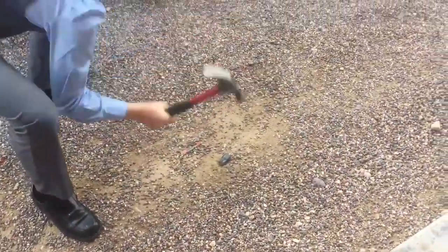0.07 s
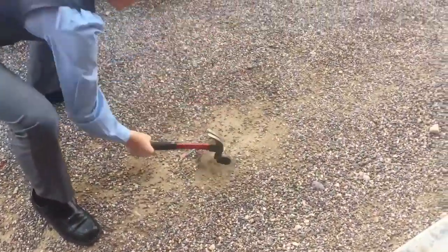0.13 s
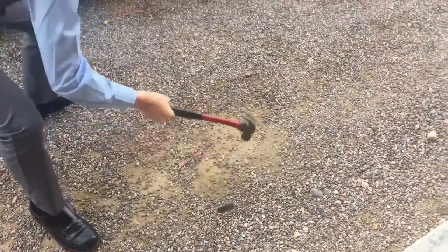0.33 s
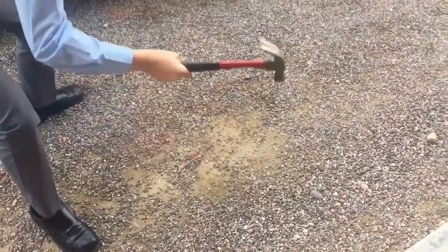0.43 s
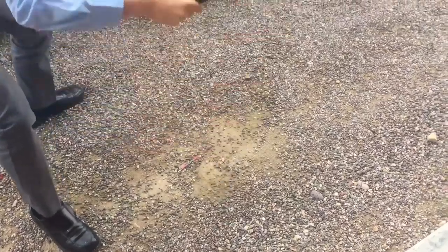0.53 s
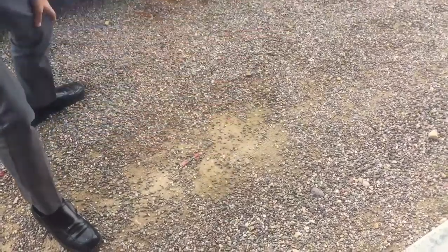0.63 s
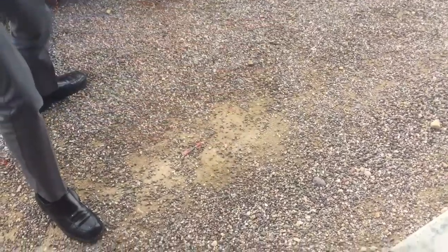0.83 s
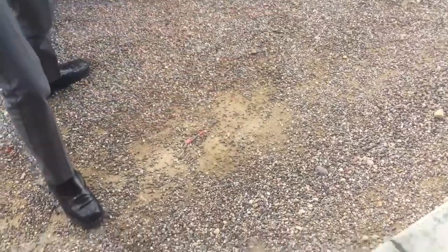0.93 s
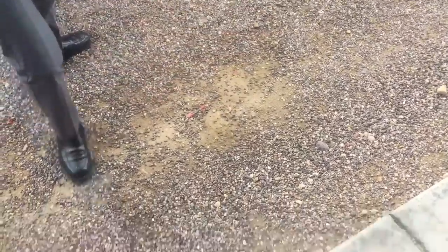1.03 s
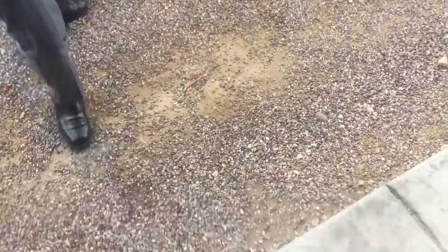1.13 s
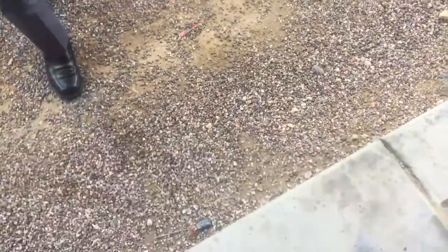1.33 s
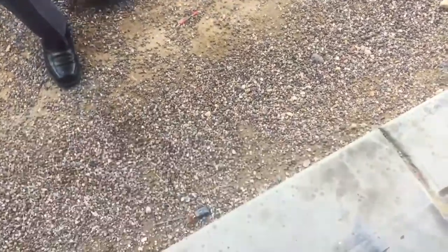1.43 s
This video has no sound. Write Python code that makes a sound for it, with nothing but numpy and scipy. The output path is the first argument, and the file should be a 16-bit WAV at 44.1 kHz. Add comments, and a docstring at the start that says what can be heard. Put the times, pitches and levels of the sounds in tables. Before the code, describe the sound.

A hammer strikes a small plastic device on gravel outdoors, close to the microphone. A light knock at 0.1 s, then at 0.23 s a very loud, overloaded crack with a short ground thump and sprayed stones. Pebbles tick. At 0.57 s the device lands crunching, with sharp clattering knocks around 0.7 s. From 1.0 s a shoe scuffs gravel, strongest near 1.15 s. A faint engine hum drops in pitch after 0.55 s.

```python
"""A hammer hits a small plastic device on gravel: quick cracks of noise, sine thuds and sprayed stones.
The device lands with a crunch and tumbles: each knock is a snap, a short ring and a rattle of noise.
Pebbles tick as tiny snaps with a fizz, fine grit patters, and a shoe scuffs the gravel as coarse and fine noise.
Behind it a distant engine hums on two sine tones that drop in pitch, over rumble and faint air noise.
"""
import sys
import numpy as np
from scipy import signal
from scipy.fft import rfft, irfft, next_fast_len
from scipy.io import wavfile
from scipy.ndimage import uniform_filter1d, map_coordinates

SR = 44100
rng = np.random.default_rng(int(sys.argv[2]) if len(sys.argv) > 2 else 0)


def to_wav(sig):
    """Store sig (one row per channel, or 1-D mono) as 16-bit WAV at the path in sys.argv[1].

    Samples outside -1..1 are clipped; the rate is SR.
    """
    pcm = np.clip(np.atleast_2d(sig), -1, 1) * 32767
    pcm = np.round(pcm).astype(np.int16)
    wavfile.write(sys.argv[1], SR, pcm.T)  # frames by channels


N = 66150  # samples
T = np.arange(N) / SR  # time of each sample, s

# In spectra the levels only set the colour (balance between pitches); t60 is the time to fall by 60 dB.

# Engine tone: [t/s, pitch f/Hz, level/dB, octave level/dB]
ENGINE = [(0, 139.5, -52, -60), (.1, 139.5, -57, -60), (.17, 139, -51, -60), (.36, 139.5, -50, -64),
          (.55, 139, -48, -60), (.6, 129, -48, -68), (.69, 130, -45, -72), (.73, 125, -54, -72),
          (.77, 120, -50, -72), (.86, 116.5, -46, -68), (.92, 111.5, -48, -64), (1.02, 113, -45, -63),
          (1.1, 114, -47, -63), (1.22, 113.5, -49, -65), (1.5, 113.5, -46.5, -67)]
# Colour of the low rumble: [f/Hz, level/dB]
RUMBLE_COLOUR = [(20, -18), (45, -6), (65, -1), (92, 0), (110, -10), (160, -12), (350, -22), (500, -60)]
# Loudness of the rumble: [t/s, level/dB]
RUMBLE_LEVEL = [(0, -44.5), (.06, -54), (.2, -47.5), (.35, -45.5), (.55, -55), (.7, -56), (1, -54.5),
                (1.25, -54), (1.5, -54)]
# Colour of the faint air noise: [f/Hz, level/dB]
AIR_COLOUR = [(300, -4.5), (600, 2.5), (1200, -3), (2500, -5.5), (7000, -17.5), (12000, -19),
              (16000, -27.5)]
AIR_DB = -64

# Loudness of fine grit falling: [t/s, level/dB]
PATTER_LEVEL = [(0, -93), (.09, -65.5), (.13, -59.5), (.2, -64), (.36, -62), (.55, -66.5), (.68, -54.5),
                (.8, -62), (.87, -69), (.95, -70.5), (1.5, -70)]

# Loudness of the shoe scuff, each column trimmed in scuff(): [t/s, crunch level/dB, treble level/dB]
SCUFF_LEVELS = [(0.93, -70, -75), (0.982, -48, -88), (0.994, -56, -73), (1.036, -41, -45.5),
                (1.054, -42, -50), (1.076, -43.5, -53.5), (1.128, -33.5, -49.5), (1.17, -32, -47),
                (1.25, -41.5, -66.5), (1.328, -46.5, -58), (1.354, -52, -73), (1.374, -55, -87),
                (1.424, -76.5, -82), (1.444, -58, -79.5), (1.48, -54.5, -57.5), (1.5, -72, -75)]
# Colour of the coarse crunch under the sole: [f/Hz, level/dB]
CRUNCH_COLOUR = [(150, 1.5), (230, 7.5), (390, -6.5), (660, -0.5), (1100, -0.5), (1600, 3), (2400, -6),
                 (4500, -14.5), (6000, -54)]
SAND_S, SAND_LENGTH_S, SAND_DB = 1.313, .032, -53.5  # a short spill of sand, all treble

# Pebbles ticking down: [t/s, level/dB, pitch f/Hz]
TICKS = [(0.2137, -38.5, 5470), (.3752, -36.5, 8000), (0.3813, -34.5, 13460), (0.3898, -40.5, 8600),
         (0.404, -39, 13360), (.4085, -38, 9050), (0.4305, -39.5, 10540), (.456, -33.5, 9530),
         (.4911, -35.5, 9980), (0.5109, -30, 7900), (.669, -40.5, 13000), (0.8012, -42, 4900),
         (0.8132, -36.5, 4550), (0.8351, -33.5, 11000), (0.8974, -34.5, 12400), (1.0135, -33.5, 4000),
         (1.021, -40.5, 12900), (1.283, -38, 6000), (1.4157, -45.5, 11000), (1.442, -36.5, 4300)]

# Resonances of the plastic case: [f/Hz, width/Hz, lift/dB]
CASE_RESONANCES = [(390, 60, 7), (630, 90, 5), (930, 110, 5), (1230, 120, 5), (1620, 150, 5),
                   (2100, 200, 4), (3350, 300, 5), (6200, 500, 3)]
# Colour of the landing crunch: [f/Hz, level/dB]
LANDING_COLOUR = [(70, -29.5), (150, -2), (400, -20), (900, -10.5), (1300, -2), (2000, -10.5), (3500, -7),
                  (9000, -10.5), (14000, -15), (16000, -20)]
# How slowly each pitch of the landing fades: [f/Hz, t60/s]
LANDING_T60 = [(500, 0.18), (1500, 0.12), (5000, 0.12), (15000, 0.057)]
LANDING_S, LANDING_DB = .5695, -21.5
SKID_S = 0.009  # the fading by pitch waits this long

# Knocks on the stones: [t/s, level/dB, pitch f/Hz, treble level/dB, bass level/dB,
# rattle level/dB relative to the knock, rattle t60/s, rattle lead-in time constant/s]
KNOCKS = [(0.033, -38.5, 3200, -52, -46, -18, 0.066, 0.0014),
          (.109, -19, 1820, -2.5, -10, -15, 0.2, 0.0055), (0.6564, -38.5, 1900, 2, -42, -3, 0.094, .001),
          (0.6961, -11.5, 3170, 0, -27, -16.5, 0.13, 0.00017),
          (0.7114, -30.5, 3160, 3, -27, -13, 0.085, 0.0024),
          (0.7368, -17.5, 2220, 2, -13, -16, 0.13, 0.0003),
          (0.7473, -13.5, 4250, 0, -3.5, -17.5, 0.066, 0.00032),
          (0.7595, -28, 3750, -0.5, -33, -11.5, 0.22, 0.0003),
          (0.825, -29.5, 3940, -3, -50, -18.5, 0.089, 0.0027),
          (0.9781, -35, 3570, 8, -10.5, -16, 0.039, 0.00079),
          (1.0361, -26.5, 6300, 0.5, -14, -21, 0.024, 0.00089),
          (1.0454, -32, 2060, -4, -5, -11.5, 0.14, 0.00089),
          (1.056, -35.5, 1910, -17.5, -11, -8, 0.066, 0.0054),
          (1.108, -32.5, 1890, -18, -18, -14, .03, 0.0012),
          (1.1229, -25, 2230, -29, -6, -10.5, 0.05, 0.0012),
          (1.138, -29, 1700, -20, -5, -14, 0.21, 0.00099),
          (1.1772, -19, 1500, -40, -9, -16, 0.077, 0.00083),
          (1.1828, -26, 1670, -39, -19, -9, 0.12, 0.0021),
          (1.293, -35.5, 2470, -4, -5.5, -8, 0.052, 0.0012),
          (1.333, -31, 1360, -19.5, -28, -17, 0.11, 0.0013),
          (1.3504, -26, 1544, -18.5, -34.5, -12.5, .1, 0.0006),
          (1.4455, -26, 1703, -19, -33, -14.5, 0.12, 0.0063),
          (1.4633, -37, 1600, -12, -38, -8.5, 0.13, 0.0016)]
RATTLE_DULLS_S = 0.0078  # the treble of a rattle halves this fast away from its peak
TAP_DB, TAP_CYCLES = -6.5, 0.5  # ring at the knock's pitch, relative level; cycles to its fullest swell
HOLLOW_DB, HOLLOW_T60_S = -12, .045  # ring of the lowest case resonance, relative to each knock's bass

# Hammer contacts: [t/s, level/dB]
CONTACTS = [(.2349, 3), (.2357, 1), (.2375, 4), (.2384, -2), (.2403, -1)]
# Colour of plastic under the steel: [f/Hz, level/dB]
CRUSH_COLOUR = [(180, -17.5), (300, 2.5), (977, -15), (3180, 2), (6190, -7), (7310, -10.5), (11300, -12),
                (14700, -16), (16000, -46.5)]
MUFFLED_S, MUFFLED_HZ = .2388, 7500  # the head beds in and the crack loses its top
# Thump of the ground: [f/Hz, level/dB, t60/s]
THUD = [(100, -16.5, 0.15), (127.4, -11.5, 0.12), (157.4, 3, 0.038), (221, -18, 0.074), (371, -12, 0.025),
        (609.5, -13, 0.041)]
THUD_S, THUD_RISE_S = .2402, 0.004
THUD_SAG, THUD_SAG_S = .26, .007  # deep thuds start this share higher and settle with this time constant
# Colour of gravel thrown by the blow: [f/Hz, level/dB]
SPRAY_COLOUR = [(150, -25.5), (300, -0.5), (900, -15), (1700, -2), (3300, 1), (7800, -4.5), (16000, -28.5)]
# How slowly each pitch of the spray fades: [f/Hz, t60/s]
SPRAY_T60 = [(500, 0.22), (3000, 0.18), (8000, 0.13), (15000, 0.24)]
SPRAY_DB = -20
# Colour of stones rolling on after the blow: [f/Hz, level/dB]
SETTLE_COLOUR = [(500, -20.5), (1200, -4.5), (2500, -2.5), (4200, 0), (6000, -12), (16000, -17.5)]
SETTLE_DB, SETTLE_T60_S = -33, 0.3

LOW_CUT_HZ, TOP_HZ = 62, 16100


def amp(db):
    """Turn a level in dB into a plain multiplier."""
    return 10 ** (np.asarray(db) / 20)


def unit(x):
    """Scale x to an average (rms) strength of 1."""
    return x / np.sqrt(np.mean(x ** 2) + 1e-20)


def along(points, hz):
    """Read a value at each frequency by joining (Hz, value) points on a log axis."""
    f, v = np.transpose(points)
    return np.interp(np.log(hz + 1), np.log(f + 1), v)


def curves(rows):
    """Join the rows in time: one value per sample for each column after the time."""
    s, *cols = np.transpose(rows)
    return [np.interp(T, s, c) for c in cols]


def filtered(x, response):
    """Strengthen or weaken each frequency of x by response(frequency)."""
    m = next_fast_len(x.shape[-1] + 4096)
    spectrum = rfft(x, m) * response(np.fft.rfftfreq(m, 1 / SR))
    return irfft(spectrum, m)[..., :x.shape[-1]]


def cased(spectrum):
    """Lift a spectrum at the resonances of the case."""
    hz = np.geomspace(50, 20000, 400)
    lift = sum(db / (1 + (2 * (hz - c) / w) ** 2) for c, w, db in CASE_RESONANCES)
    return np.transpose([hz, along(spectrum, hz) + lift])


def grit(spectrum, grain_db, size=N, grain_s=0.00098):
    """Dense stone grains: noise whose strength jumps from grain to grain and from pitch to pitch."""
    draw = np.clip(rng.standard_normal(size // 8 + 1), -2, 2)
    grain_number = (np.arange(size) / max(grain_s * SR, 8)).astype(int)
    strength = amp(grain_db * draw)[grain_number]
    z = signal.stft(strength * rng.standard_normal(size), nperseg=128)[2]
    # random patches over pitch and time give the grains different pitches
    patches = uniform_filter1d(rng.standard_normal(z.shape), size=2, axis=0)
    patches = unit(uniform_filter1d(patches, size=2, axis=1))
    z = z * amp(grain_db * np.clip(patches, -2, 2))
    grains = signal.istft(z, nperseg=128)[1][:size]
    return unit(filtered(grains, lambda hz: amp(along(spectrum, hz))))


def snap(spectrum, ripple_db, size=1024):
    """One sharp contact of peak 1: a pulse with its energy up front and random ripples in its spectrum."""
    hz = np.fft.rfftfreq(size, 1 / SR)
    ripple = unit(uniform_filter1d(rng.standard_normal(len(hz)), size=16))
    db = np.clip(along(spectrum, hz), -70, None) + ripple_db * ripple
    # folding the cepstrum (transform of the log spectrum) keeps the pulse from starting early
    cepstrum = irfft(db * np.log(10) / 20)
    cepstrum[1:size // 2] *= 2
    cepstrum[size // 2 + 1:] = 0
    pulse = irfft(np.exp(rfft(cepstrum)))
    return pulse / np.abs(pulse).max()


def add(out, s, x):
    """Mix x into out from time s."""
    out[round(s * SR):][:len(x)] += x


def dying(x, t60, start_s):
    """Fade each frequency of x at its own speed from start_s on; before that x is unchanged."""
    hz, t, z = signal.stft(x, SR, nperseg=128)
    t60_here = np.clip(along(t60, hz), .01, 2)[:, None]
    fade = amp(-60 * np.clip(t - start_s, 0, None) / t60_here)
    return signal.istft(z * fade, SR, nperseg=128)[1][:N]


def fade_from(s, rise_s, t60):
    """Silence until s, then a quick rise with a steady fall."""
    u = np.clip(T - s, 0, None)
    return (1 - np.exp(-u / rise_s)) * amp(-60 * u / t60)


def background():
    """Engine tone with its octave, the lower one slightly unsteady, over rumble and faint air."""
    hz, level_db, octave_db = curves(ENGINE)
    waver = map_coordinates(rng.standard_normal(64), [T * 30])  # 30 random points a second
    turn = 2 * np.pi * np.cumsum(hz) / SR
    tone = amp(level_db + 0.63 * waver) * np.sin(turn)
    octave = amp(octave_db) * np.cos(2 * turn + 4.1)
    hum = np.sqrt(2) * (tone + octave)  # a sine of peak sqrt(2) has rms 1
    rumble = amp(curves(RUMBLE_LEVEL)[0]) * grit(RUMBLE_COLOUR, grain_db=3.0)
    air = amp(AIR_DB) * grit([(150, -12)] + AIR_COLOUR, grain_db=2.5)
    return hum + rumble + air


def patter():
    """Fine grit keeps falling around the impacts: bright grainy noise that swells and sinks."""
    colour = [(800, -11.0), (2500, 2.0), (4000, 4.0), (9000, 0.0), (16000, -5.0)]
    return amp(curves(PATTER_LEVEL)[0]) * grit(colour, grain_db=3.0)


def scuff():
    """A sole drags through the gravel: coarse crunch, finer hiss and a spill of sand."""
    crunch_db, treble_db = curves(SCUFF_LEVELS)
    start = np.clip((T - SCUFF_LEVELS[0][0]) / 0.035, 0, 1)
    coarse_colour = [(80, -40)] + CRUNCH_COLOUR + [(9000, -40)]
    coarse = amp(crunch_db - 6) * grit(coarse_colour, grain_db=3, grain_s=.001)
    fine_colour = [(3000, -15), (5000, 3.0), (10000, -1.5), (16000, -8.5)]
    fine = amp(treble_db - 5.5) * grit(fine_colour, grain_db=3.5)
    spill = np.sin(np.pi * np.clip((T - SAND_S) / SAND_LENGTH_S, 0, 1))
    sand_colour = [(5000, -42), (9000, -6.5), (13000, -0.5), (16000, -9)]
    sand = amp(SAND_DB) * spill * grit(sand_colour, grain_db=1.5)
    return start * (coarse + fine) + sand


def ticks():
    """Small pebbles: a thin bright snap with a short fizz."""
    out, n = np.zeros(N + SR), SR // 20
    t = np.arange(n) / SR
    for s, db, hz in TICKS:
        colour = [(500, -35), (0.27 * hz, -9), (hz, 0), (16000, -6)]
        fizz = amp(db - 17.5 - 60 * t / 0.044) * grit(colour, grain_db=8, size=n)
        add(out, s, amp(db) * snap(colour, ripple_db=-2.5))
        add(out, s, fizz)
    return out[:N]


def knocks():
    """A sharp contact around its pitch, inside a rattle of case and stones that dulls as it fades."""
    out, n = np.zeros(N + SR), SR // 4
    t = np.arange(n) / SR - .03  # the rattle begins 0.03 s before the contact
    u = t - t[0]  # time since the contact, for the rings
    for s, db, hz, treble_db, bass_db, rattle_db, t60, lead_s in KNOCKS:
        bass = [(120, bass_db - 24.5), (330, bass_db), (650, bass_db - 1.5)]
        middle = [(max(0.61 * hz, 750), -6), (hz, 0), (min(2.3 * hz, 9000), -10)]
        treble = [(9500, treble_db - 7.5), (16000, treble_db - 21.5)]
        colour = cased(bass + middle + treble)

        swell = np.where(t < 0, np.exp(t / max(lead_s, 1e-4)), amp(-60 * t / max(t60, .01)))
        rattle = grit(colour, grain_db=2, size=n, grain_s=.001)
        dull = filtered(rattle, lambda f: 1 / (1 + (f / (1.5 * hz)) ** 4))
        dulling = dull + (rattle - dull) * .5 ** (np.abs(t) / RATTLE_DULLS_S)

        c = u * hz / TAP_CYCLES
        tap = c * np.exp(1 - c) * np.cos(2 * np.pi * hz * u)
        hollow = np.sin(2 * np.pi * CASE_RESONANCES[0][0] * u) * amp(-60 * u / HOLLOW_T60_S)

        add(out, s, amp(db - 1.5) * snap(colour, ripple_db=3.0))
        add(out, s, amp(db + TAP_DB) * tap)
        add(out, s, amp(db + bass_db + HOLLOW_DB) * hollow)
        add(out, s + t[0], amp(db + rattle_db) * swell * dulling)
    return out[:N]


def landing():
    """The device skids into the gravel, then the stones settle: noise fading at its own speed per pitch."""
    crunch = dying(grit(cased(LANDING_COLOUR), grain_db=1.5), LANDING_T60, LANDING_S + SKID_S)
    body = filtered(crunch, lambda hz: 1 / (1 + (hz / 2000) ** 4))
    # the low crunch builds as it digs in
    crunch = crunch - body * np.exp(-np.clip(T - LANDING_S, 0, None) / 0.0067)
    return amp(LANDING_DB) * crunch * fade_from(LANDING_S, 0.0001, 5.7)


def hammer():
    """The head cracks the case in quick contacts, thumps the ground and sprays gravel."""
    bursts = sum(amp(db - 6.0) * fade_from(s, 0.00035, 0.0077) for s, db in CONTACTS)
    crack = bursts * grit(CRUSH_COLOUR, grain_db=-9.5)
    for s, db in CONTACTS:
        add(crack, s, amp(db) * snap(CRUSH_COLOUR, ripple_db=5.5))
    dull = filtered(crack, lambda hz: 1 / (1 + (hz / MUFFLED_HZ) ** 6))
    crack = dull + (crack - dull) * amp(-60 * np.clip(T - MUFFLED_S, 0, None) / 0.0054)

    u = np.clip(T - THUD_S, 0, None)
    sagging = u + THUD_SAG * THUD_SAG_S * (1 - np.exp(-u / THUD_SAG_S))
    thud = np.zeros(N)
    for hz, db, t60 in THUD:
        clock = sagging if hz < 300 else u  # only the deep tones slide down
        thud += amp(db) * fade_from(THUD_S, THUD_RISE_S, t60) * np.sin(2 * np.pi * hz * clock)

    start = CONTACTS[0][0]
    spray = dying(grit(cased(SPRAY_COLOUR), grain_db=2), SPRAY_T60, start + .01)
    spray = amp(SPRAY_DB) * spray * fade_from(start, .003, 9)
    settle = grit(cased(SETTLE_COLOUR), grain_db=3.0, grain_s=.002)
    settle = amp(SETTLE_DB) * fade_from(start, 0.007, SETTLE_T60_S) * settle
    return crack + thud + spray + settle


def scene():
    """Add up everything at one microphone."""
    surroundings = background() + patter() + scuff()
    device = ticks() + knocks() + landing() + hammer()
    return (surroundings + device)[None]


def record(dry):
    """The microphone rolls off deep bass, the input clips at full scale, and the top band is cut off."""
    thin = filtered(dry, lambda hz: (1j * hz / (LOW_CUT_HZ + 1j * hz)) ** 2)
    clipped = thin / (1 + np.abs(thin) ** 8) ** (1 / 8)  # slightly rounded clipping
    return filtered(clipped, lambda hz: hz < TOP_HZ)


dry = scene()
out = record(dry)
to_wav(out)
```